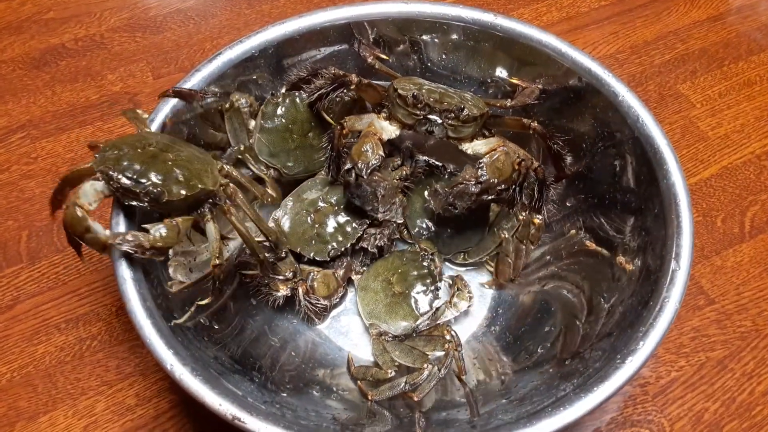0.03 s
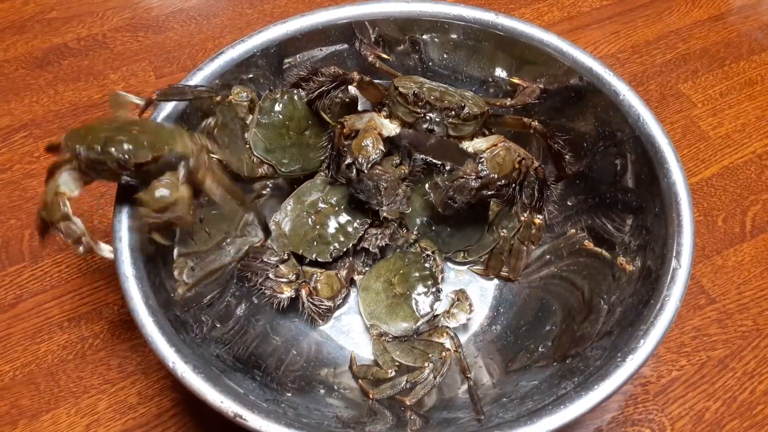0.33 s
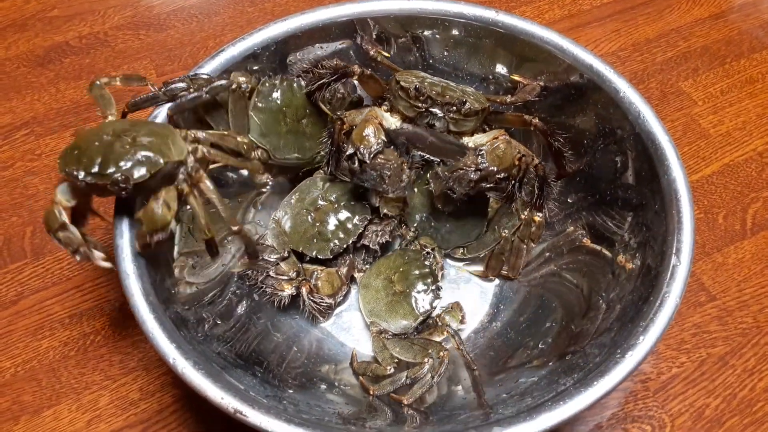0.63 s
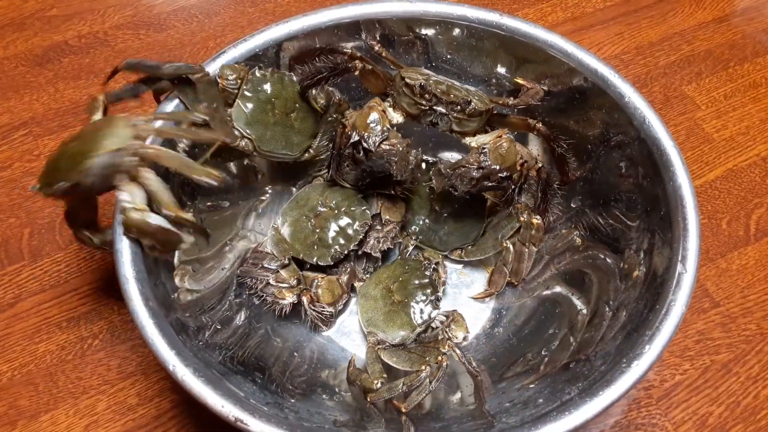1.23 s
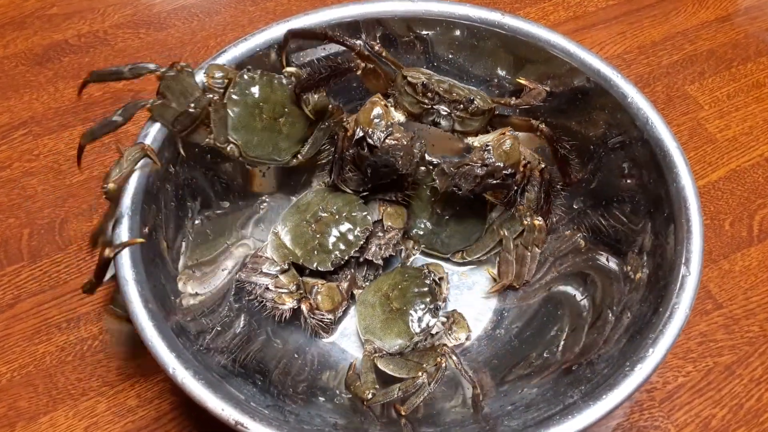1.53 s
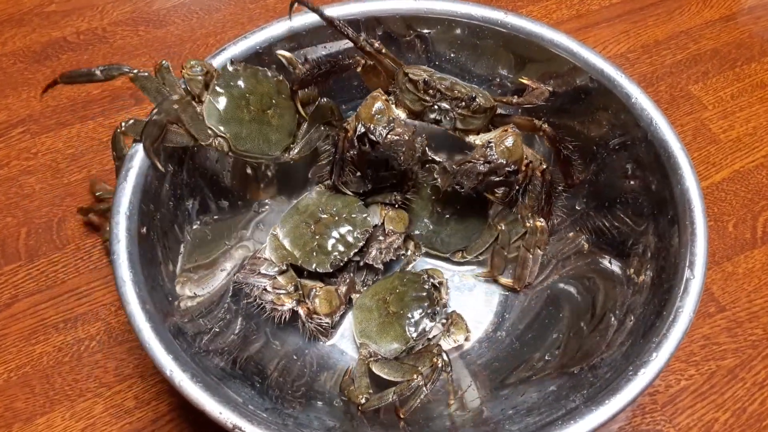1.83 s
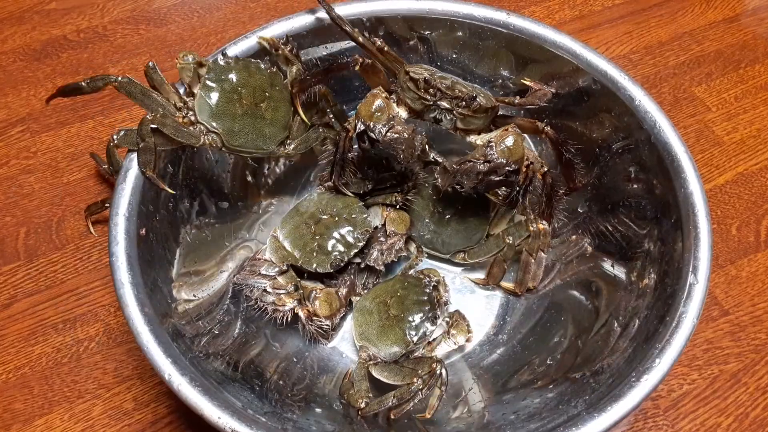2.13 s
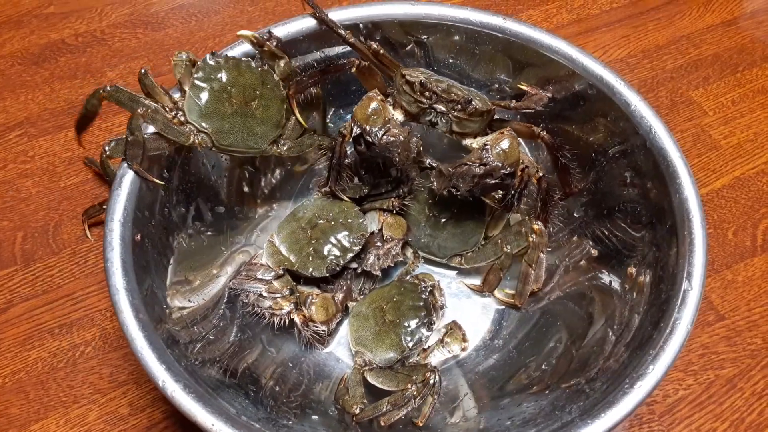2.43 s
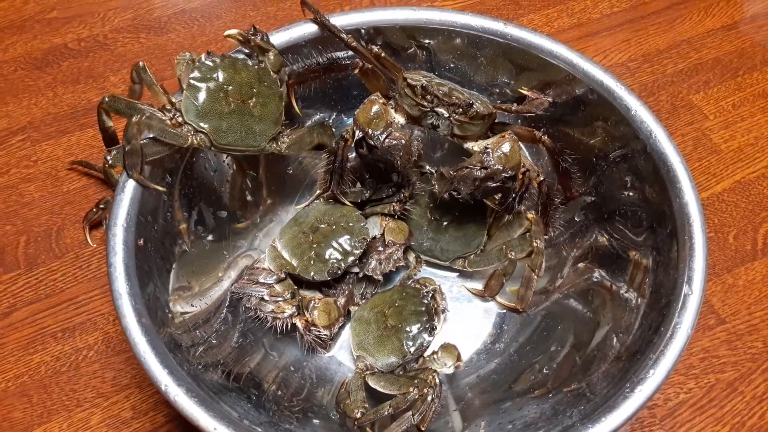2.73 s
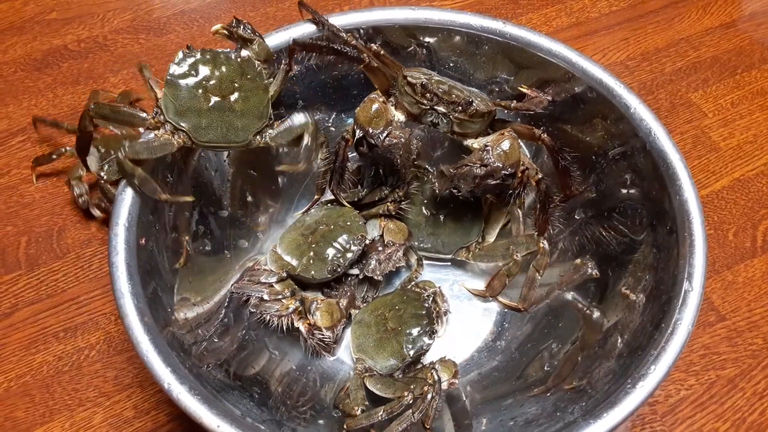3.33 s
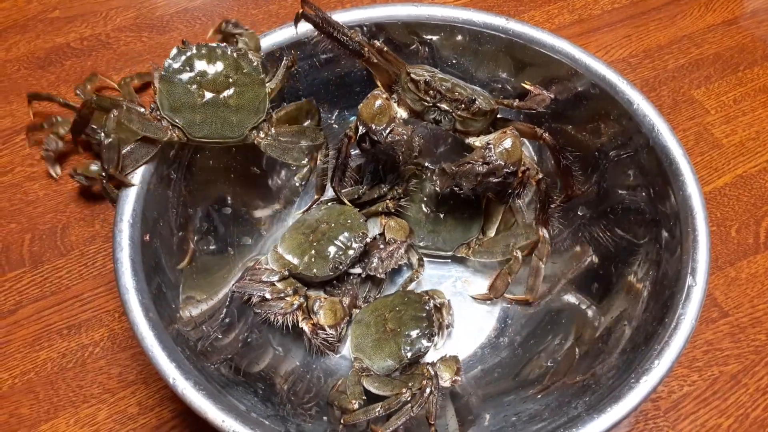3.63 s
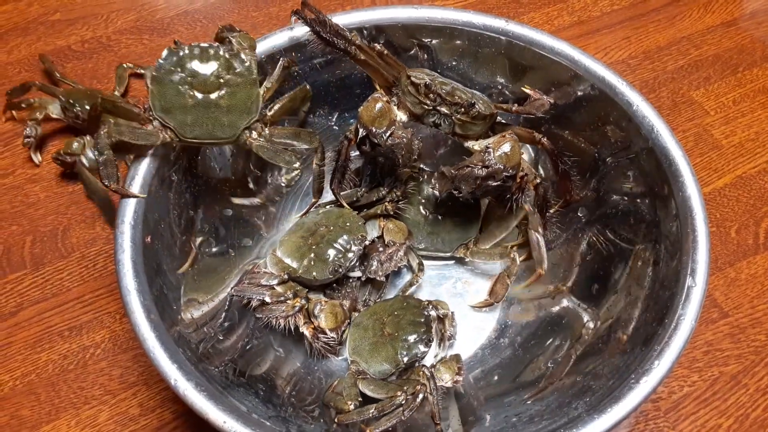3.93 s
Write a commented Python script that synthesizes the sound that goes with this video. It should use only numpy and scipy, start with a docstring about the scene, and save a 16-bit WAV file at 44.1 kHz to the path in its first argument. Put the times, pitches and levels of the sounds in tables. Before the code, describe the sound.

Crab legs click and clatter against a steel bowl while a thin, very high whistle pulses.

```python
"""Live crabs clamber in a steel bowl on a wooden table in a small room; one topples over the rim.
Leg tips tap and skid on the steel, exciting its modes by impact and stick-slip friction.
Wet joints and mouths tick, and soft, heavy contacts sound the table's low modes as dull knocks.
Behind them are faint swishes, room tone and the very high whistle pulses of some appliance,
perhaps a pest repeller, which the room's reflections smear."""
import sys
import numpy as np
from scipy import signal
from scipy.fft import rfft, irfft
from scipy.io import wavfile

SR = 44100
rng = np.random.default_rng(int(sys.argv[2]) if len(sys.argv) > 2 else 0)


def to_wav(s):
    """Save 16-bit WAV."""
    ch = np.atleast_2d(s).T  # columns
    pcm = np.round(np.clip(ch, -1, 1) * 32767)  # PCM
    wavfile.write(sys.argv[1], SR, pcm.astype(np.int16))


N = 176400
T = np.arange(N) / SR
AGE = T[:SR // 2]  # time since the start of one event [s]

# spectrum of the room tone (frequency [Hz], gain [dB])
ROOM_TONE_SPECTRUM = [(25, -27), (70, -1), (130, -6.5), (300, -10), (1000, -16), (3500, -22.5),
                      (6000, -27.5), (10000, -36), (16000, -40)]
# faint rising swishes (time [s], peak level [dB])
SWISH_EVENTS = [(2.63, -66.5), (2.844, -70.5)]
# envelope of a dragged leg's scratch (time [s], level [dB])
SCRATCH_ENVELOPE = [(3.66, -110), (3.685, -43), (3.75, -52), (3.845, -91), (3.86, -57.5), (3.89, -86),
                    (3.912, -55), (3.98, -101)]
# spectrum of that scratch (frequency [Hz], gain [dB])
SCRATCH_SPECTRUM = [(300, -22), (800, -10), (1150, -1.5), (1800, -3), (2800, -8), (6000, -19.5),
                    (15000, -37.5)]
# spectrum of the hiss of wet shells (frequency [Hz], gain [dB])
HISS_SPECTRUM = [(3000, -15.5), (6000, -17.5), (7400, 8.5), (8500, -2), (10000, -21.5), (15000, -18.5)]
# envelope of that hiss (time [s], level [dB])
HISS_ENVELOPE = [(0, -60.5), (.3, -79.5), (1.9, -63), (2.15, -66), (2.5, -84), (3, -89), (3.5, -70.5),
                 (3.85, -63.5), (4, -81.5)]
# wet ticks (time [s], relative level [dB], centre frequency [Hz])
TICK_EVENTS = [(0.591, -46, 5800), (0.7306, -48, 12540), (0.736, -46, 3900), (.965, -46, 4000),
               (0.991, -46, 4640), (1.1322, -44, 4080), (1.158, -52, 4700), (1.179, -50, 5500),
               (2.404, -54.5, 3950), (2.4582, -59, 3630), (2.594, -55.5, 3660), (3.126, -53, 4450),
               (3.5092, -58, 4020), (3.5775, -46.5, 7250), (3.8038, -46.5, 4300)]
# dull knocks (time [s], relative level [dB], low-pass corner [Hz])
KNOCK_EVENTS = [(0.358, -58.5, 90.7), (0.421, -52.5, 89), (.55, -61.5, 400), (1.085, -52.5, 100),
                (1.221, -50, 480), (1.32, -38.5, 123), (1.362, -40, 402), (1.448, -34.5, 476),
                (1.901, -27.5, 379), (1.924, -36.5, 540), (2.607, -63, 403), (3.03, -51, 283),
                (3.334, -39.5, 195), (3.742, -43, 208)]
# modes of the table under the bowl (frequency [Hz], relative level [dB], T60 [s])
TABLE_MODES = [(101.6, -12, 0.36), (158.6, 0, 0.18), (197, -0.5, 0.16), (291, 6.5, 0.22), (364, -7, 0.23),
               (379, -7, 0.25), (416, -10, 0.12), (443, -4.5, 0.19), (538.5, -2.5, 0.25)]
# spectrum of a knock's thud (frequency [Hz], gain [dB])
THUD_SPECTRUM = [(30, -4), (120, 4), (300, -8), (600, -8), (1200, -10.5), (2500, -2), (6000, -19.5),
                 (16000, -32.5)]
# modes of the loaded bowl (frequency [Hz], relative level [dB])
BOWL_MODES = [(1150, -19), (1770, 2.5), (1836, 6), (1905, 7), (1990, -2), (2245, -5), (2945, -7.5),
              (3410, -15), (3750, -2), (3850, 0), (4228, -13), (4715, -6.5), (5505, -2), (6200, -16.5),
              (6430, -19.5), (7100, 9.5), (7940, -6), (8820, -16.5), (11620, -4), (12200, -7),
              (12820, -8.5)]
# spectrum of the contact crack (frequency [Hz], gain [dB])
CRACK_SPECTRUM = [(200, -23), (700, -10.5), (1150, -0.5), (1450, -7.5), (1850, 2), (2550, -7.5),
                  (3800, 4.5), (5500, -2.5), (7600, 10), (9800, -5), (12500, -0.5), (16000, -20.5)]
# envelope of the fine scrabbling of all the legs (time [s], level [dB])
SCRABBLE_ENVELOPE = [(0, -68), (.27, -77.5), (.4, -57), (.65, -71.5), (.85, -60), (1, -75), (1.25, -56.5),
                     (1.4, -42), (1.58, -57.5), (1.7, -49.5), (1.85, -68), (2.15, -65), (2.45, -88),
                     (3, -75.5), (3.3, -73), (3.6, -82), (3.88, -95), (4, -75)]
# blows of leg and shell on the bowl, with relative band levels
# (time [s], low band [dB], mid band [dB], high band [dB], skid time [s], ring over crack [dB])
BLOW_EVENTS = [(0.297, -51, -61.5, -58.5, 0.0034, 10), (0.331, -53.5, -50, -61, 0.0032, 8),
               (0.383, -61, -63, -50.5, 0.0026, 17), (0.414, -54.5, -47.5, -46.5, 0.0034, 2),
               (0.431, -68, -69, -46, 0.0014, 8), (0.46, -49, -66, -41, 0.00086, -23),
               (0.4922, -44, -41, -32.5, 0.0069, -11.5), (0.658, -45.5, -54.5, -49.5, 0.0035, 0.5),
               (0.8116, -81, -71, -40.5, 0.0054, -14), (0.8945, -45.5, -43.5, -58, 0.00084, 7.5),
               (0.918, -48, -46.5, -63, 0.00088, 0), (0.972, -54.5, -59, -46.5, 0.0017, 3),
               (1.0043, -42, -39.5, -46, 0.0033, 1.5), (1.057, -48.5, -52, -61, 0.0024, -2),
               (1.076, -40.5, -39, -65, 0.0036, -1.5), (1.2715, -34, -32, -39, .0012, -1.5),
               (1.3198, -44, -30.5, -47, 0.0016, -24.5), (1.3317, -33.5, -32, -26.5, 0.01, 4.5),
               (1.357, -37, -25.5, -30.5, .008, 1.5), (1.3662, -24, -25, -25.5, 0.0015, 4),
               (1.4284, -20, -28.5, -30, 0.0062, 2.5), (1.4407, -34, -40.5, -30, 0.0069, -22),
               (1.539, -46.5, -48.5, -48.5, 0.0021, -12.5), (1.6142, -40.5, -42.5, -42, 0.002, 8),
               (1.63, -44.5, -68, -43.5, 0.0045, 9), (1.652, -46, -41, -39.5, 0.026, -1),
               (1.682, -28, -28, -39.5, 0.0013, 30.5), (1.6963, -33, -42, -35.5, 0.0063, 14),
               (1.702, -56, -54, -30, 0.0056, 0), (1.89, -41.5, -42, -33.5, 0.0034, -29),
               (1.918, -43.5, -43, -31, 0.001, -22.5), (2.015, -51.5, -55.5, -61, 0.0021, 1),
               (2.0812, -53.5, -56, -74, 0.0022, -6), (2.1909, -33.5, -26, -20.5, 0.0015, -14.5),
               (3.4256, -65, -58, -50.5, .008, -22), (3.68, -41.5, -33, -36.5, 0.0018, -5)]


def amp(db):
    """Amplitude ratio for a level in decibels."""
    return 10 ** (np.asarray(db) / 20)


def fade(t60):
    """Exponential decay of 60 dB in t60 seconds."""
    return np.exp(-np.log(1000) * AGE / t60)


def unit(x):
    """Energy normalisation: an event equals 20 ms at full level."""
    return x / np.sqrt(np.mean(np.sum(x ** 2, axis=-1)) / (SR / 50))


def level(x, db):
    """RMS normalisation to a level in decibels."""
    return x * amp(db) / np.sqrt(np.mean(x ** 2))


def follow(x, envelope):
    """Amplitude modulation by an envelope of (time [s], level [dB]) points."""
    return level(x, np.interp(T, *np.array(envelope).T))


def pan(db):
    """Constant-power panning, with the left channel db above the right."""
    return amp(np.array([[db], [-db]]) / 2) / np.sqrt(np.cosh(db * np.log(10) / 20))


def noise(size):
    """Uncorrelated white noise in two channels."""
    return rng.standard_normal((2, size))


def colour(x, spectrum):
    """Minimum-phase filtering: folding the cepstrum gives a causal response with this spectrum."""
    hz, db = np.array(spectrum).T
    bins_hz = np.arange(1025) * SR / 2048
    gain = amp(np.interp(np.log(bins_hz + 1), np.log(hz), db))
    cepstrum = irfft(np.log(gain))
    response = irfft(np.exp(rfft(np.r_[cepstrum[0], 2 * cepstrum[1:1024]], 2048)))
    return signal.fftconvolve(np.atleast_2d(x), response[None], axes=1)[:, :x.shape[-1]]


def cut(x, hz, kind, order=4):
    """Butterworth filtering, maximally flat in the passband."""
    return signal.sosfilt(signal.butter(order, hz, kind, fs=SR, output="sos"), x)


def add(out, s, x):
    """Superposition of an event starting at s seconds."""
    i = max(int(s * SR), 0)
    out[:, i:i + x.shape[-1]] += x[..., :max(N - i, 0)]


def room(x, wet_db, low_t60=.28, treble_t60=.14):
    """Reverberation: diffuse reflections follow the direct sound, and their treble dies sooner."""
    diffuse = noise(len(AGE))
    low = cut(diffuse, 5000, "low", order=1)
    build_up = np.clip(AGE / .0044 - .3, 0, 1)
    tail = (low * fade(low_t60) + (diffuse - low) * fade(treble_t60)) * build_up
    tail /= np.sqrt(np.sum(tail ** 2) / 2)
    return x + amp(wet_db) * signal.fftconvolve(x, tail, axes=1)[:, :N]


def room_tone():
    """Ambient noise, coherent between the channels in the bass and incoherent in the treble."""
    bass = cut(rng.standard_normal(N), 290, "low", order=1)
    treble = cut(noise(N), 480, "high", order=1)
    return level(colour(bass + treble, ROOM_TONE_SPECTRUM), db=-74)


def whistle(pitch_hz=15530, waver_hz=105, first_s=.131, period_s=.2206):
    """Periodic pulses with random frequency modulation; direct and reflected energy are equal."""
    out = np.zeros((2, N))
    lead_s, swell_s, decay_s = .05, .003, .011
    age = AGE - lead_s
    envelope = 1 / (np.exp(-age / swell_s) + np.exp(age / decay_s))
    for s in np.arange(first_s - period_s, N / SR, period_s) - lead_s:
        waver = level(cut(rng.standard_normal(len(AGE)), 140, "low"), db=0)
        pulse = envelope * np.sin(2 * np.pi * np.cumsum(pitch_hz + waver_hz * waver) / SR)
        tail = noise(len(AGE)) * fade(t60=.2)
        reflected = signal.fftconvolve(pulse[None], tail, axes=1)[:, :len(AGE)]
        elapsed = max(int(-s * SR), 0)  # the earliest pulse starts before time zero
        add(out, s, (unit(pulse) + unit(reflected))[:, elapsed:])
    return out * amp(-29.5) * pan(7.5)


def swishes(length_s=.15, start_hz=474, rise_hz_per_s=40000, half_width_hz=550):
    """Sidebands of a noise-modulated rising tone form a faint band of hiss that glides upward."""
    out = np.zeros((2, N))
    glide = np.sin(2 * np.pi * np.cumsum(start_hz + rise_hz_per_s * AGE) / SR)
    envelope = np.sin(np.pi * np.minimum(AGE / length_s, 1))
    for s, db in SWISH_EVENTS:
        band = cut(noise(len(AGE)), half_width_hz, "low", order=2)
        add(out, s, level(band, db) * glide * envelope)
    return out


def scratch(slips_per_s=5100):
    """Dry friction: a dragged leg gives a dense random train of slips."""
    slips = noise(N) * (rng.random(N) < slips_per_s / SR)
    return room(follow(colour(slips, SCRATCH_SPECTRUM), SCRATCH_ENVELOPE), wet_db=-7.5)


def shell_hiss():
    """Spectrally shaped noise: the thin hiss of wet shells."""
    return follow(colour(noise(N), HISS_SPECTRUM), HISS_ENVELOPE)


def ticks(attack_s=.0003, half_width_octaves=.12):
    """Damped transients: wet joints and mouths give brief noise bursts, each round one pitch."""
    out = np.zeros((2, N))
    envelope = fade(t60=.011) * (1 - np.exp(-(AGE / attack_s) ** 2))
    for s, db, hz in TICK_EVENTS:
        edges_hz = hz * 2 ** (half_width_octaves * np.array([-1, 1]))
        band = cut(rng.standard_normal(len(AGE)), edges_hz, "band", order=1)
        add(out, s, level(band, db + 2.5) * envelope * pan(3 * rng.standard_normal()))
    return room(out, wet_db=-3.5)


def knocks(scatter_db=3, detune=.0014):
    """Modal response of the table: the softer a heavy contact, the less treble it excites."""
    out = np.zeros((2, N))
    for s, db, corner_hz in KNOCK_EVENTS:
        ring = 0
        for mode_hz, mode_db, t60 in TABLE_MODES:
            gain = amp(mode_db + scatter_db * rng.standard_normal())
            hz = mode_hz * (1 + detune * rng.standard_normal())
            ring += gain * np.sin(2 * np.pi * hz * AGE) * fade(t60) * rng.choice([-1, 1])
        ring = cut(unit(ring), corner_hz, "low", order=3)
        thud = colour(rng.standard_normal(len(AGE)) * fade(t60=.32), THUD_SPECTRUM)
        thud = cut(unit(thud), corner_hz, "low", order=1)
        knock = cut(ring + amp(-2) * thud, 90, "high", order=3)
        add(out, s, amp(db - 1) * unit(knock) * pan(2))
    return room(out, wet_db=-20)


def bowl_ring(split=.005, scatter_db=6, t60_at_2khz=.12, damping_exponent=.13):
    """Mode splitting: the crabs' load makes beating pairs of partials, weighted anew at each contact."""
    out = np.zeros((2, len(AGE)))
    for hz, db in BOWL_MODES:
        start_phase = rng.uniform(0, 2 * np.pi, (2, 1))
        detune, weight, lag = rng.standard_normal((3, 2, 1))
        phase = 2 * np.pi * hz * (1 + split * detune) * AGE + start_phase
        gains = amp(db + scatter_db * weight)
        left = np.sum(gains * np.sin(phase), axis=0)
        right = np.sum(gains * np.sin(phase + 2 * lag), axis=0)
        out += np.array([left, right]) * fade(t60_at_2khz * (2000 / hz) ** damping_exponent)
    return unit(out)


def shell_crack(cluster_hz=110, cluster_db=5):
    """Impact transient of shell, with a short rattle of partials clustered round the bowl's modes."""
    bins_hz = np.fft.rfftfreq(len(AGE), 1 / SR)
    gap_hz = np.min([abs(bins_hz - hz) for hz, _ in BOWL_MODES], axis=0)
    clusters = amp(cluster_db * np.exp(-(gap_hz / cluster_hz) ** 2))
    partials = irfft(rfft(noise(len(AGE))) * clusters)
    snap, rattle = fade(t60=.018), amp(-5) * fade(t60=.14)
    return unit(colour(partials * (snap + rattle), CRACK_SPECTRUM))


def scrabble(contacts_per_s=1200, spread_db=7.5):
    """Shot noise: countless faint leg contacts arrive at random and excite steel and shell."""
    contacts = rng.random(N) < contacts_per_s / SR
    strength = amp(spread_db * np.minimum(rng.exponential(size=N), 4))
    impulses = contacts * strength * rng.choice([-1, 1], N)
    response = shell_crack() + amp(-14.5) * bowl_ring()
    legs = signal.fftconvolve(impulses[None], response, axes=1)[:, :N]
    return room(follow(legs, SCRABBLE_ENVELOPE), wet_db=-4.5)


def blows(slips_per_s=1500, sizzle_db_per_doubling=3):
    """Impact and stick-slip: a leg lands on the bowl, catches and slips; longer skids sizzle more."""
    out = np.zeros((2, N))
    age = AGE[:SR // 16]
    for s, low_db, mid_db, high_db, skid_s, ring_db in BLOW_EVENTS:
        force = .5 * rng.standard_normal(len(age)) * (rng.random(len(age)) < slips_per_s / SR)
        force *= np.exp(-(age / skid_s) ** 2)
        force[0] = 1  # the landing
        response = shell_crack() + amp(ring_db) * bowl_ring()
        hit = signal.fftconvolve(response, force[None], axes=1)[:, :len(AGE)]
        sizzle_db = high_db - 7.5 + sizzle_db_per_doubling * np.log2(skid_s / .003)
        low = unit(cut(hit, 2500, "low")) * amp(low_db) * pan(7)
        mid = unit(cut(hit, (2500, 6000), "band")) * amp(mid_db) * pan(-1.5)
        high = unit(cut(hit, (6000, 9500), "band")) * amp(high_db) * pan(.5)
        sizzle = unit(cut(hit, 9500, "high")) * amp(sizzle_db) * pan(1)
        add(out, s, low + mid + high + sizzle)
    return room(out * amp(-5), wet_db=-6.5)


def scene():
    """Linear superposition: the pressures of all the sources add."""
    crabs = blows() + ticks() + knocks() + scrabble() + shell_hiss() + scratch()
    return crabs + swishes() + whistle() + room_tone()


def record(dry, top_hz=16500):
    """Band limiting: a steep elliptic low-pass removes the very top of the treble."""
    return signal.sosfilt(signal.ellip(10, .1, 80, top_hz, fs=SR, output="sos"), dry)


dry = scene()
out = record(dry)
to_wav(out)
```